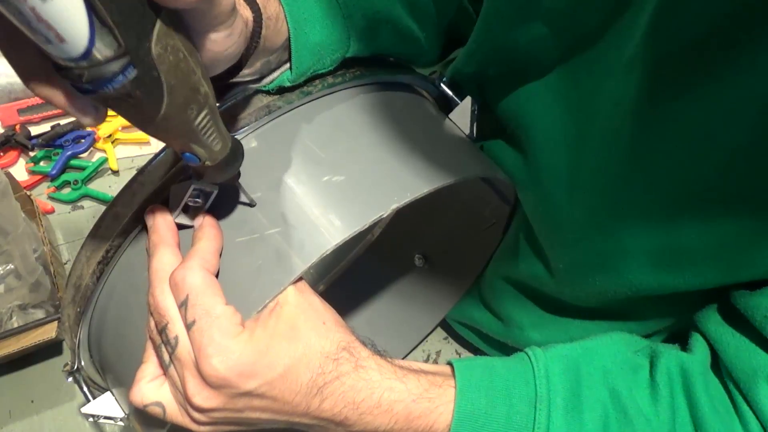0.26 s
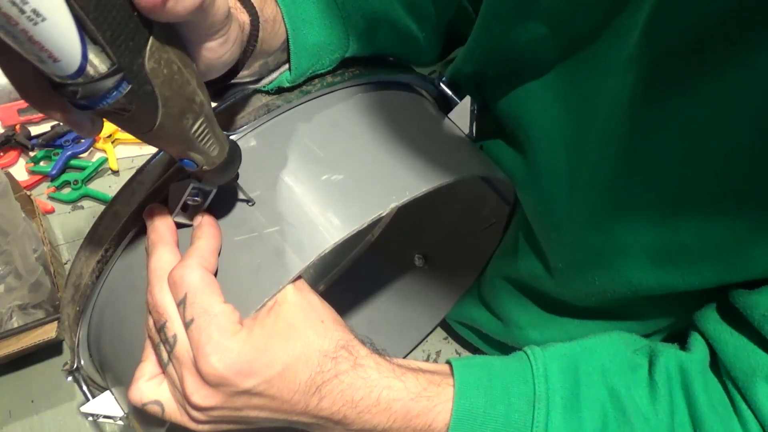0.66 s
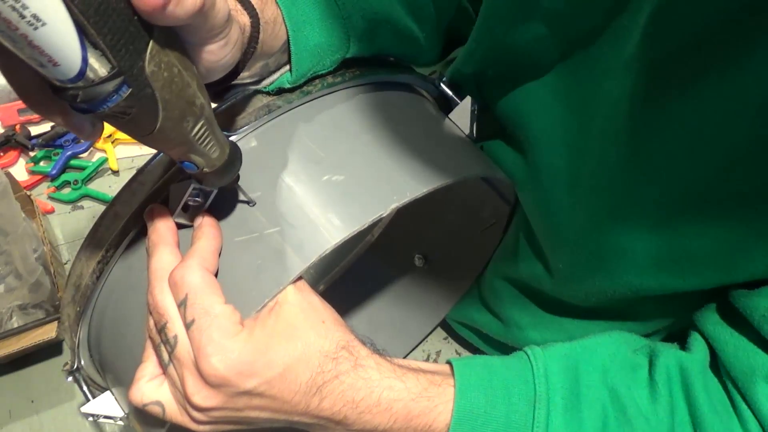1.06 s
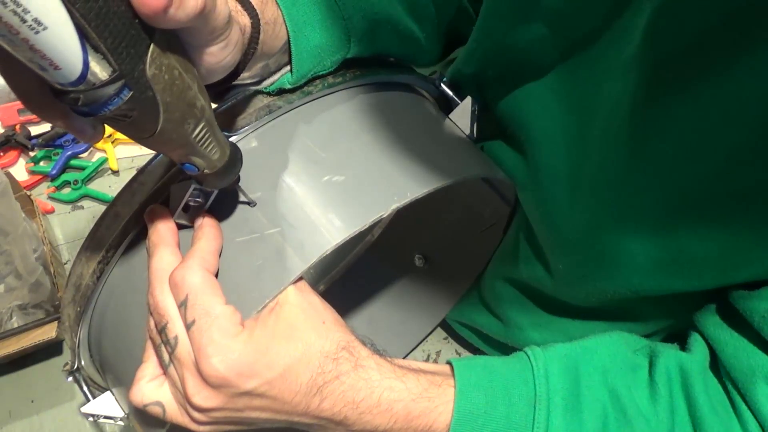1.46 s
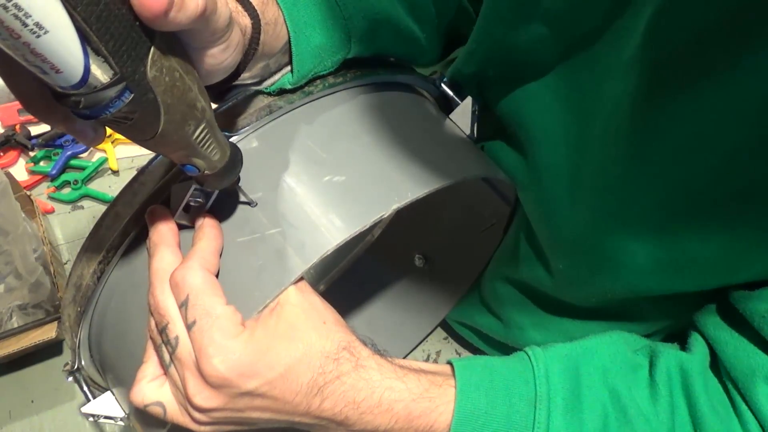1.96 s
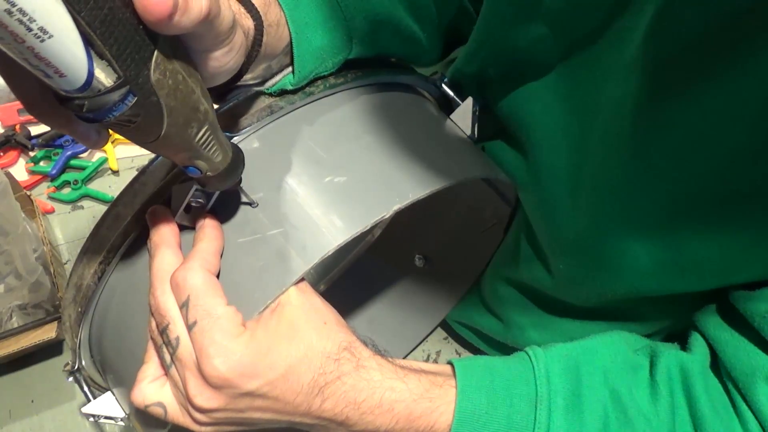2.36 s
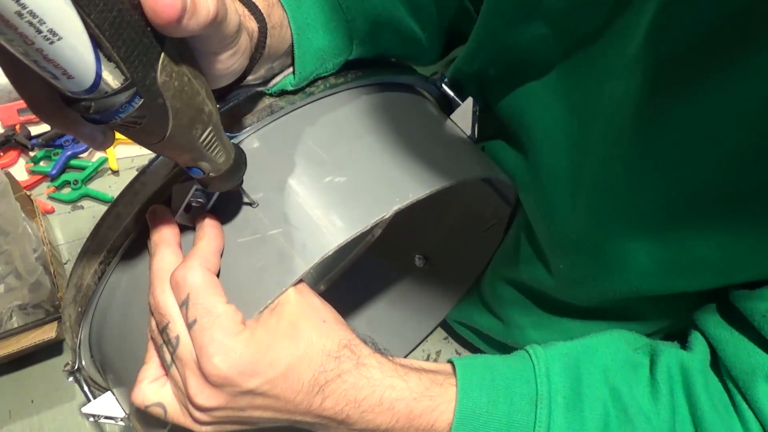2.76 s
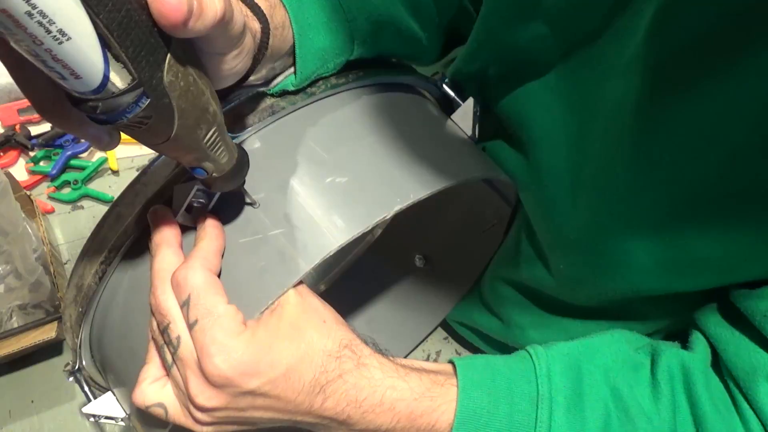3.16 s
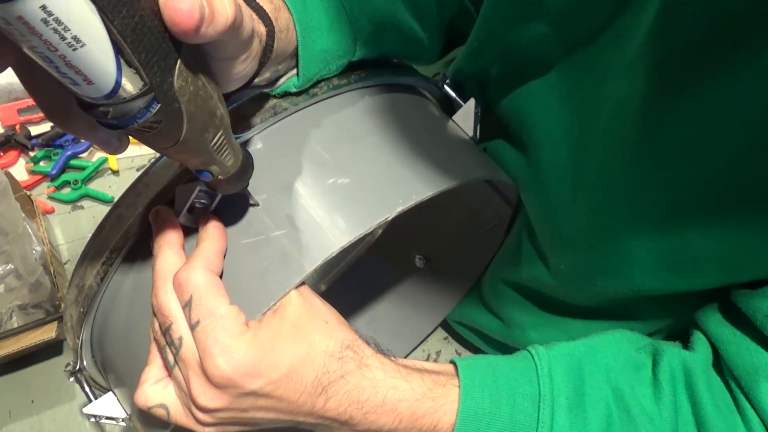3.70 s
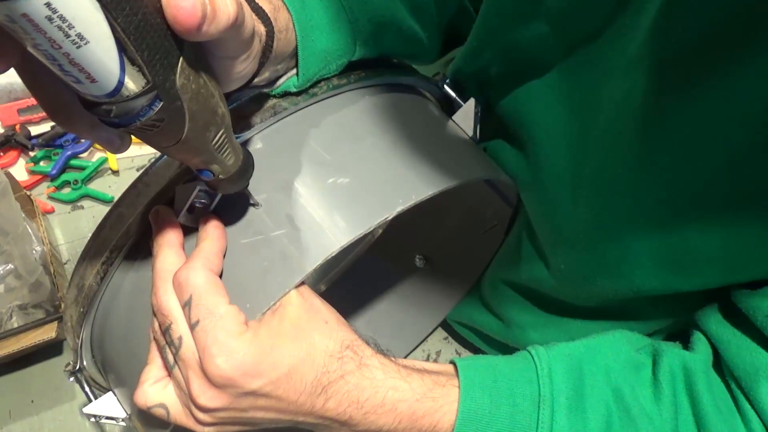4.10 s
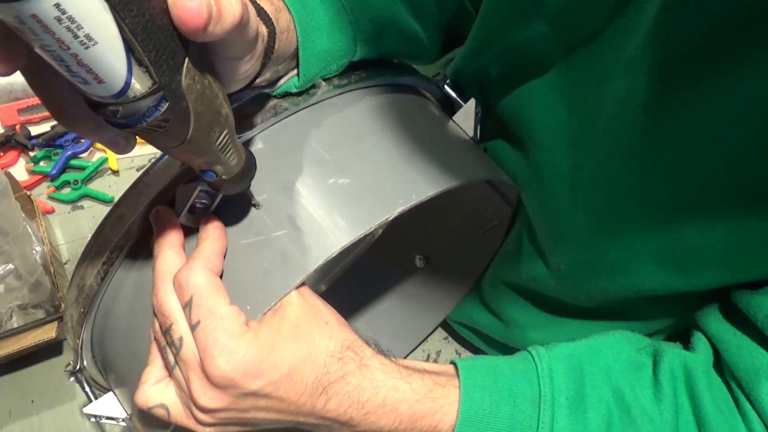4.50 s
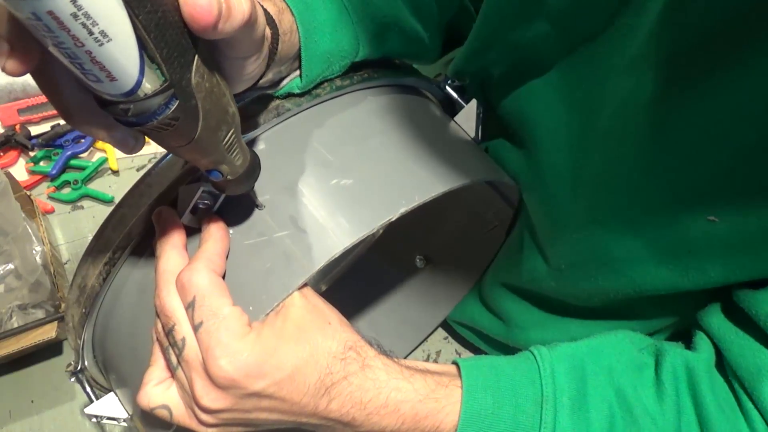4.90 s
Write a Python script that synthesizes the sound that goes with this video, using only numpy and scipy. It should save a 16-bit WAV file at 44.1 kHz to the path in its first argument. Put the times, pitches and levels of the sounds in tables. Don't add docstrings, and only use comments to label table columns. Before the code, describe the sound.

A small handheld rotary tool runs throughout, cutting into a hollow plastic tub, heard very close with short reflections off the bench. At 0-0.25 s the bit skates and snags: a rasping buzz, gritty ticks, and a quick pitch dip, with a thin squeal near 7 kHz. By 0.4-1.1 s the load eases and the motor races at about 180 turns per second, its whine and brush fizz clear, broken by brief scrapes around 0.75-1 s. From 1.2 to 2 s the edge bites again, hard and buzzy, chattering and ringing the wall as pitch falls. After 2 s the bit sinks in; a bearing tone sings, and the drone sags to roughly 120 turns by 3.4 s. Around 4-4.5 s a dense bright hiss peaks over a weaker buzz. The squeal, sliding lower, returns strongly near 4.6 s, and the motor labours unevenly below 90 turns, growling as it ends around 5.1 s.

```python
import sys
import numpy as np
from scipy import signal
from scipy.fft import rfft, irfft, next_fast_len
from scipy.io import wavfile
from scipy.ndimage import uniform_filter1d

SR = 44100
rng = np.random.default_rng(int(sys.argv[2]) if len(sys.argv) > 2 else 0)


def wav_out(sig):
    wavfile.write(sys.argv[1], SR, np.round(np.clip(np.atleast_2d(sig).T, -1, 1) * 32767).astype(np.int16))


def natural_amplitude(level_db):
    exponent = np.asarray(level_db, float) / 20
    return 10 ** exponent


N = 227011
TIME_S = np.arange(N) / SR


def rms_one(x):
    return x / np.sqrt(np.mean(x ** 2) + 1e-20)


def in_time(rows):
    s, *columns = np.transpose(rows)
    return [np.interp(TIME_S, s, c) for c in columns]


def at_hz(points, hz):
    table_hz, db = np.transpose(points)
    return np.interp(np.log(hz), np.log(table_hz), db)


def spell(s, start, length, edge):
    return np.clip(np.minimum(s - start, start + length - s) / edge + .5, 0, 1)


def drift(rate_hz):
    r = np.exp(-128 * np.pi * rate_hz / SR)
    slow = signal.lfilter([1], [1, -2 * r, r * r], rng.standard_normal(N // 64 + 1002))[1000:]
    return np.interp(np.arange(N) / 64, np.arange(len(slow)), rms_one(slow))


def colour(x, spectrum, peaks=(), lift_db=0):
    size = next_fast_len(N + 4096)
    hz = np.fft.rfftfreq(size, 1 / SR) + 1
    power = 1
    for peak_hz, width_hz, db in peaks:
        power = power + natural_amplitude(lift_db + db) ** 2 / (1 + (2 * (hz - peak_hz) / width_hz) ** 2)
    return irfft(rfft(x, size) * natural_amplitude(at_hz(spectrum, hz)) * np.sqrt(power), size)[:N]


def bandpass(x, low_hz, high_hz):
    return signal.sosfilt(signal.butter(2, [low_hz, high_hz], "band", fs=SR, output="sos"), x)


def grit(turns, gate, grain_db, flicker_db):
    grains = rng.standard_normal(N) * natural_amplitude(grain_db * rng.standard_normal(N))
    bite = np.exp(gate * np.cos(2 * np.pi * turns))
    return grains * bite * natural_amplitude(flicker_db * drift(16.4))


def once_a_turn(turns):
    return np.diff(np.floor(turns), prepend=0)


def tone(cycles, db):
    return np.sqrt(2) * natural_amplitude(db) * np.sin(2 * np.pi * (cycles + rng.random()))


# start in seconds, length in seconds, mode in Hz, lift in dB (negative: weaker).
RINGS = [(-0.074, 0.14, 1104, 15), (0.01, 0.15, 792, 12), (0.41, 0.48, 1530, -13),
         (.12, 0.12, 1010, 14), (0.223, 0.25, 939, 12.5), (0.134, 0.1, 500, 11.5),
         (0.023, 0.1, 2180, 9), (0.145, 0.078, 1970, 6), (.15, 0.047, 2240, 8),
         (0.22, 0.13, 2380, 10), (0.25, 0.65, 2730, 6), (0.73, 0.39, 2060, -3),
         (0.283, 0.38, 1040, 8), (1.126, 0.33, 181, 12), (1.5, 0.19, 173, 6.5),
         (1.08, 0.26, 545, 9), (1.05, 0.31, 920, 7.5), (1.1, 0.39, 1450, 4.5),
         (1.48, 0.51, 1590, 10), (1.31, 0.32, 1920, 7), (1.293, 0.13, 2170, 13),
         (.203, 0.016, 1000, -9), (1.56, 0.74, 4450, 4), (1.357, 0.13, 1330, 10.5),
         (1.44, 0.06, 2600, 3), (1.1, 0.084, 362, 5), (1.43, 0.13, 350, 7),
         (1.584, 0.58, 505.4, 11.5), (1.44, 0.69, 668, 9.5), (1.5, 0.53, 1030, 12.5),
         (1.7, 0.14, 1300, 0), (0.14, 0.19, 4350, 3), (0.6, 0.64, 4350, -8),
         (0.59, 0.62, 5300, -11), (.14, 0.064, 2100, 5), (1.17, 0.08, 2130, -7),
         (1.5, 0.03, 2300, -7), (1.46, 0.037, 2800, 3), (0.26, 0.54, 880, -5),
         (-0.095, 0.2, 2000, -8), (1.506, 0.11, 3050, 11), (-0.13, .3, 3800, -11),
         (0.22, 0.53, 9500, 5), (0.19, 0.29, 11100, 8.5), (.14, 0.049, 2350, 3),
         (1.31, 0.082, 2490, 6), (0.235, 0.15, 1020, 2.5), (1.465, .04, 178, -10),
         (0.31, 0.51, 353, -6.5), (0.023, 0.22, 1580, 8),
         (1.9, 0.37, 330, 11.5), (1.96, 0.38, 1280, 11), (2.08, 0.41, 1064, 10),
              (1.9, 0.46, 2295, 4.5), (2.51, .3, 2300, 6.5), (2.62, 0.17, 1074, 9.5),
              (2.648, 0.2, 1560, 12), (2.373, 0.6, 320, 4), (3.101, 0.13, 775, 5.5), (3.276, 0.71, 804, 10),
              (3.91, 0.34, 790, 7), (2.2, 0.11, 2560, 11), (2.2, 0.057, 2500, -5.5),
              (1.77, .07, 1020, -2.5), (2.31, 0.57, 2640, 7), (1.9, 0.12, 550, 10), (3.44, 0.54, 687, 3),
              (4.28, 0.13, 330, 14), (4.6, 0.385, 189, 9), (3.75, 0.2, 230, 7), (4.397, 0.29, 310, 7.5),
              (5.1, .2, 780, 9), (4.872, 0.26, 273, 18.5), (4.4, 0.12, 1370, 7), (1.946, .3, 620, 8),
              (2.59, 0.47, 398, -13), (3.15, 1, 340, -0.5), (3.43, 0.82, 1360, -13), (3.53, 0.78, 1460, 10),
              (6.8, 0.26, 1065, 10), (4.8, 0.26, 1450, 4), (3.5, 0.089, 540, 1), (4.973, 0.19, 184, 18.5),
              (4.95, 0.24, 364, 17), (3.4, 0.46, 1045, 7), (4.66, 0.18, 780, 7.5), (4.6, 0.1, 550, 17),
              (5.05, .15, 585, 15), (4.36, 0.85, 1250, -8), (5, 0.24, 1400, 6.5), (4.9, 0.12, 1000, -1),
              (3.2, 0.27, 1470, -2), (3.115, 0.04, 135, -16), (3.41, .035, 121, -12), (4.44, .1, 105, -9),
              (2.62, 0.27, 150, -3.5), (4.17, 0.29, 215, 8.5), (4.45, 0.073, 320, -2),
              (2.75, 0.14, 304, 8.5), (5.08, .1, 270, -5)]


def ringing_db(hz):
    step = np.arange(0, N, 256)
    width = .13
    lift_db = 0
    for start, length, mode_hz, db in RINGS:
        swell = spell(step / SR, start, length, .025 + .25 * length)
        off_mode = 2 * (hz[step] / mode_hz - 1) / width
        lift_db = lift_db + db * swell / (1 + off_mode ** 4)
    return np.interp(np.arange(N), step, lift_db)


# start in seconds, length in seconds, share of scatter left, pushes the wall out 0-1.
SQUARE_HITS = [
    (.2, .03, .85, 0),
    (1.3, .13, .45, 1),
    (1.45, .04, .25, 0),
    (1.52, .18, .42, 1),
    (1.76, .07, .7, 0),
    (3.35, .85, .25, 0),
    (4.33, .12, .5, 0),
]
KNOCK_SCATTER_RAD = 1.35


def knock_scatter():
    scatter_rad = KNOCK_SCATTER_RAD
    for start, length, left, _ in SQUARE_HITS:
        scatter_rad = scatter_rad * (1 - (1 - left) * spell(TIME_S, start, length, .16))
    return scatter_rad


def knock_facing():
    return np.pi * sum(out * spell(TIME_S, start, length, .03) for start, length, _, out in SQUARE_HITS)


def order_flutter_db(speed):
    flutter_db = 1.3 + 7 * (1 - speed / speed.max()) ** 2
    return flutter_db * (1 - .7 * (1 - knock_scatter() / KNOCK_SCATTER_RAD))


BARS_LOSS_DB = .4
# order, level in dB re the whine's level.
BARS = [(25, 1), (19, -7), (18, -9), (30, -8), (32, -9), (45, -6), (46, -7), (49, -9), (51, -3), (53, -6),
        (55, -9), (56, -7), (57, -9), (58, -6), (59, -4), (60, -7), (61, -8), (62, -9), (64, -10),
        (65, -13), (67, -13)]


def comb(turns, speed):
    level_db = -56.5 - BARS_LOSS_DB / 2 * (speed.max() - speed)
    orders = [k for k in range(16, 38) if k not in dict(BARS)]
    return sum(tone(k * turns, level_db + 2.5 * drift(6)) for k in orders)


def whine(turns, speed):
    level_db = np.maximum(-46 - BARS_LOSS_DB * (speed.max() - speed), -70)
    order_db = {k: -14 for k in range(26, 66, 2)} | dict(BARS)
    out = 0
    for k, db in order_db.items():
        out = out + tone(k * turns, level_db + db + ringing_db(k * speed) + 2.5 * drift(14))
    return out


# time in seconds, ball pass in dB.
BEARING = [(0, -45), (.35, -74), (1.4, -54), (1.5, -49), (1.9, -53), (2.08, -39.5), (2.3, -35.5),
           (2.7, -40), (2.9, -35), (3.2, -36.5), (3.42, -46.5), (3.93, -40), (3.98, -54), (4.03, -41.5),
           (4.2, -45.5), (4.3, -57), (4.62, -41), (4.83, -58.5), (5.15, -49)]


def ball_bearing(turns, speed):
    balls_db, = in_time(BEARING)
    balls_db = balls_db + .7 * order_flutter_db(speed) * drift(10)
    return sum(tone((4.42 + side) * turns, balls_db + db) for side, db in [(-1, -24.5), (0, 0), (1, -13.5)])


# time in seconds, pitch in Hz, level in dB.
SQUEAL = [(0, 7370, -49), (.18, 7375, -54), (.3, 7375, -45), (.65, 7385, -45.5), (1.2, 7395, -48),
          (1.53, 7395, -48), (1.75, 7345, -48), (2.0, 7335, -43.5), (2.76, 7295, -43), (3.05, 7215, -41),
          (3.3, 7060, -40.5), (3.65, 7100, -42), (3.8, 7000, -52), (4.52, 6790, -52), (4.64, 6680, -40.5),
          (4.9, 6500, -38.5), (5.0, 6440, -37), (5.15, 6400, -38)]


def squeal():
    hz, db = in_time(SQUEAL)
    waver_hz = 2.5 + .035 * (hz.max() - hz)
    return tone(np.cumsum(hz + waver_hz * drift(64)) / SR, db + 1.3 * drift(18))


# time in seconds, share of the hiss from the buried bit 0-1, brush fizz in dB.
DEPTH = [
    (0, 0.45, -45),
    (.6, 0.5, -42),
    (1.3, 0.32, -41.5),
    (2.0, 0.42, -49),
    (2.5, 0.4, -47),
    (2.76, 0.6, -54),
    (2.83, 0.52, -51),
    (3.7, 0.72, -52),
    (4.3, 0.95, -36.5),
    (5.15, 0.85, -44),
]
# frequency in Hz, level in dB per Hz.
MOTOR_AIR = [(3000, -26), (4500, 3), (5640, 1.5), (6900, -4), (8340, -5), (10400, -0.5), (11800, -8),
             (13000, -14), (15000, -26)]
BURIED_BIT = [(4000, -58), (5050, -43), (5350, 0), (6100, -1.5), (7700, -2), (8550, -3.5), (11200, -3.5),
              (12000, -6.5), (12800, -24), (15500, -40)]
FIZZ = [(11500, -23.5), (13000, 1.5), (14400, -14), (16000, -3)]
# frequency in Hz, width in Hz, level in dB.
BIT_MODES = [(6100, 200, 0), (6570, 100, -1), (6900, 130, -1), (7610, 180, 2), (9000, 90, -2),
             (10100, 140, 2), (10750, 160, 0), (11600, 140, 2)]


def hiss(turns, hiss_db):
    depth, fizz_db = in_time(DEPTH)
    depth = np.clip(depth, 0, 1)
    air = rms_one(colour(grit(turns, .3, .5, 1), MOTOR_AIR))
    rubbing = rms_one(colour(grit(turns, .2, 1.5, .8), BURIED_BIT, BIT_MODES, lift_db=6))
    fizz = rms_one(colour(grit(turns, .18, 1.7, .87), FIZZ))
    return natural_amplitude(fizz_db) * fizz + natural_amplitude(hiss_db) * (np.sqrt(1 - depth) * air + np.sqrt(depth) * rubbing)


# frequency in Hz, level in dB per Hz.
RUMBLE = [(60, -54), (150, -25.5), (280, -10.5), (450, -8.5), (700, -3), (1000, 2.5), (1500, -8),
          (2100, -21)]
CHIPS = [(900, -101), (1400, 1.5), (1900, 0), (2300, -2), (3000, -0.5), (4000, 0.5), (5000, -8.5),
         (6500, -40)]
# frequency in Hz, width in Hz, level in dB.
TUB_MODES = [(2250, 130, 3), (2600, 80, -1), (2960, 80, 0), (3330, 70, -3), (4010, 100, -4)]


def chip_noise(turns, rumble_db, chips_db):
    rumble = rms_one(colour(grit(turns, .064, 5.5, .35), RUMBLE))
    chips = rms_one(colour(grit(turns, .3, .8, .8), CHIPS, TUB_MODES, lift_db=9))
    return natural_amplitude(rumble_db) * rumble + natural_amplitude(chips_db) * chips


# start in seconds, length in seconds, level in dB.
GRATES = [(0.138, .012, -39), (0.171, 0.02, -35), (.205, 0.014, -39), (0.75, .022, -45), (0.863, .03, -45),
          (0.958, .03, -45), (1, 0.025, -49), (1.115, 0.017, -48), (1.144, 0.1, -49), (1.358, .09, -47),
          (1.45, 0.041, -38), (1.514, 0.18, -41), (2.02, 0.33, -52), (2.403, .4, -52), (1.72, 0.059, -38),
          (1.789, .055, -39.5), (1.85, 0.055, -40), (1.898, 0.046, -40)]


def grate(turns):
    turn_gain = natural_amplitude(2.5 * rng.standard_normal(int(turns[-1]) + 2))
    strength = turn_gain[(turns + .5).astype(int)]
    torn = .4 * rms_one(grit(turns, 5, .5, .5))
    ticks = strength * (torn - rms_one(once_a_turn(turns)))
    level = sum(natural_amplitude(db) * spell(TIME_S, start, length, .008) for start, length, db in GRATES)
    return level * rms_one(bandpass(ticks, 2500, 4900))


# start in seconds, length in seconds, mode in Hz, level in dB.
RASPS = [(0.16, 0.074, 2100, -38.5), (0.2, .03, 4040, -40), (1.256, 0.022, 2100, -32),
         (1.31, .125, 2140, -42), (0.85, 0.047, 2100, -40), (.945, 0.038, 2120, -37.5),
         (0.66, 0.15, 5500, -45.5), (0.66, .07, 3100, -49), (.16, .036, 2130, -36), (.2, 0.02, 1900, -32),
         (1.4, 0.026, 5800, -41), (2.68, .13, 5700, -44), (0.93, 0.015, 920, -38),
         (1.965, 0.062, 2570, -38.5), (1.15, .06, 3280, -46), (1.057, 0.041, 770, -42),
         (0.748, 0.026, 2000, -38), (.755, .025, 4600, -46), (.87, 0.03, 2300, -46),
         (0.998, .045, 2100, -38.5), (1.14, .07, 3000, -46), (1.46, .04, 5900, -40), (1.57, 0.1, 3100, -40),
         (1.753, 0.17, 3600, -36), (1.91, 0.041, 2530, -31.5), (2.53, 0.08, 2100, -38),
         (5.04, .12, 490, -41)]


def rasp(turns):
    slaps = once_a_turn(turns) * natural_amplitude(2.5 * rng.standard_normal(N))
    chatter = rms_one(slaps) + .5 * rms_one(grit(turns, .9, 1.5, 1.5))
    out = 0
    for start, length, hz, db in RASPS:
        band = rms_one(bandpass(chatter, .9 * hz, 1.1 * hz))
        out = out + natural_amplitude(db) * spell(TIME_S, start, length, .02) * band
    return out


# frequency in Hz, level in dB per order.
KNOCK = [(1200, -13), (1700, -27), (2250, -0.5), (2800, -5), (3500, -0.5), (4800, -10), (7000, 0.5)]


def knock(turns, speed, db):
    out, power, scatter, facing = 0, 0, knock_scatter(), knock_facing()
    for k in sorted(set(range(9, 36)) - set(LOW_ORDERS)):
        spectrum_db = np.repeat(at_hz(KNOCK, k * speed[::64]), 64)[:N]
        gain = natural_amplitude(spectrum_db + 2.5 * drift(4))
        phase = 2 * np.pi * k * turns + facing + scatter * drift(3.1)
        out = out + gain * natural_amplitude(ringing_db(k * speed)) * np.cos(phase)
        power = power + gain ** 2 / 2
    return -natural_amplitude(db - 7.5) * out / np.sqrt(uniform_filter1d(power, size=4000))


LOW_ORDERS = [1, 2, 3, 4, 5, 6, 7, 8, 9, 10, 11, 12, 13, 14, 15]
# frequency in Hz, level in dB.
WALL = [(125, -58.5), (155, -72.5), (200, -63), (330, -57), (660, -53.5), (720, -43), (1100, -50),
        (2400, -47)]
OFF_BLADE_DB = {9: -3.5, 10: -4, 11: -2, 14: -5}


def low_orders(turns, speed, bite_db):
    scatter, facing, out = knock_scatter(), knock_facing(), 0
    flutter_db = order_flutter_db(speed)
    follow_db = .48 * (bite_db - bite_db.mean())
    for k in LOW_ORDERS:
        db = at_hz(WALL, k * speed) + follow_db + ringing_db(k * speed) + OFF_BLADE_DB.get(k, 0)
        db = db + flutter_db * (1 + .015 * k) * drift(10)
        flip = facing * (k > 4)
        out = out - np.sqrt(2) * natural_amplitude(db) * np.cos(2 * np.pi * k * turns + flip + scatter * drift(2.22))
    return out


# frequency in Hz, left minus right in dB.
SIDES = [(60, -1), (150, 1), (380, -1), (950, 2), (2380, 1), (5980, 2.5), (15000, -3)]
# frequency in Hz, level in dB.
SCATTER = [(60, -38), (250, -20), (700, -15.5), (1500, -12), (4000, -19.5), (8000, -15), (14000, -34)]


def to_ports(tool):
    echoes = rng.standard_normal(3000) * np.exp(-np.arange(3000) / (.02 * SR))
    echoes = echoes / np.sqrt(np.sum(echoes ** 2))
    side = colour(signal.oaconvolve(tool, echoes)[:N], SCATTER)
    left = colour(tool, [(hz, db / 2) for hz, db in SIDES])
    right = colour(tool, [(hz, -db / 2) for hz, db in SIDES])
    return np.array([left + side, right - side])


# time in seconds, speed in turns per second.
SPEED = [(0.0, 171.7), (0.18, 167.0), (0.206, 162.5), (0.236, 168.4), (0.41, 176.8), (0.73, 182.0),
         (1.27, 182.0), (2.1, 163.2), (2.53, 157.6), (2.95, 140.5), (3.31, 123.7), (3.45, 120.3),
         (3.71, 120.0), (4.61, 102.4), (4.81, 96.9), (4.84, 94.2), (5.02, 93.8), (5.08, 87.4)]
# time in seconds, bite of the edge in dB, chip flow in dB, rubbing in dB.
CUT = [(0, -31.5, -38, -39.5), (.12, -34.5, -46.5, -37.5), (.25, -41, -45, -41.5), (.56, -48, -44.5, -41.5),
       (1.12, -41, -44.5, -42.5), (1.18, -35, -42.5, -41.5), (1.44, -31.5, -39, -38),
       (1.86, -28.5, -37.5, -34.5), (1.97, -34.5, -39, -34.5), (2.0, -36.5, -44, -37.5),
       (2.3, -33.5, -39.5, -37), (2.76, -37, -35.5, -34), (2.83, -33.5, -36, -31), (3.7, -40.5, -34, -31.5),
       (3.98, -47.5, -33, -26), (4.36, -41.5, -34.5, -24.5), (4.6, -47, -35.5, -29.5),
       (5.15, -49, -35.5, -31)]
# start in seconds, length in seconds, lift in dB.
SNAGS = [(0.129, 0.018, 9), (0.145, 0.064, 6.5), (0.184, 0.048, 3), (0.751, 0.026, 10), (0.863, 0.047, 7.5),
         (0.907, 0.25, 5), (0.999, 0.035, 3.5), (1.463, 0.056, 4), (1.711, 0.35, 2), (1.794, 0.041, 3.5),
         (1.93, 0.038, 2), (2.524, 0.033, 0.5), (4.816, 0.06, 0.5), (5.003, 0.084, 1)]


def scene():
    speed, = in_time(SPEED)
    bite_db, chips_db, rub_db = in_time(CUT)
    snag_db = sum(db * spell(TIME_S, start, length, .01) for start, length, db in SNAGS)
    snag_db = snag_db * (1 + .1 * drift(41))
    judder = .0004 + .01 * (1 - speed / speed.max()) ** 2
    judder = judder + .0004 * snag_db
    turns = np.cumsum(speed * (1 + judder * drift(19.2))) / SR
    bite_db = bite_db + .41 * snag_db
    rumble_db = -46.5 + .48 * (chips_db - chips_db.mean()) + 1.19 * snag_db
    tool = comb(turns, speed) + whine(turns, speed) + ball_bearing(turns, speed) + squeal()
    tool = tool + hiss(turns, rub_db + .24 * snag_db) + chip_noise(turns, rumble_db, chips_db + snag_db)
    tool = tool + grate(turns) + rasp(turns)
    tool = tool + knock(turns, speed, bite_db) + low_orders(turns, speed, bite_db)
    return to_ports(tool)


def top_cut(x):
    return signal.sosfilt(signal.butter(12, 15710, fs=SR, output="sos"), x)


def record(dry):
    mix = signal.sosfilt(signal.butter(2, 55, "high", fs=SR, output="sos"), dry)
    return top_cut(mix)


dry = scene()
out = record(dry)
wav_out(out)
```